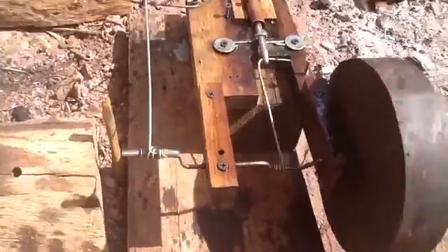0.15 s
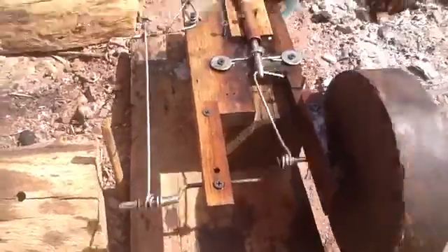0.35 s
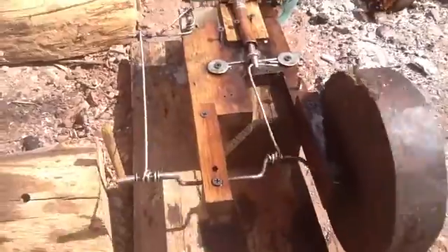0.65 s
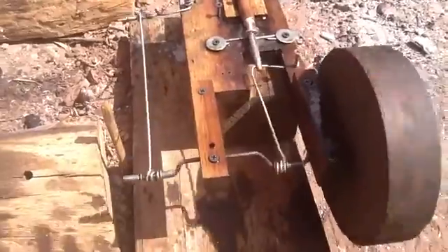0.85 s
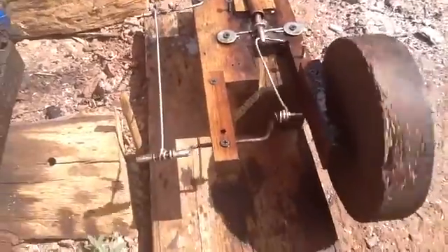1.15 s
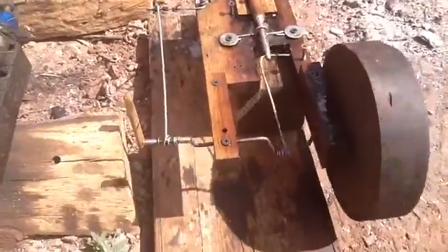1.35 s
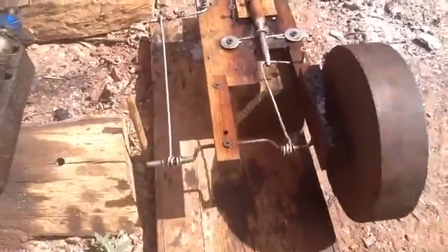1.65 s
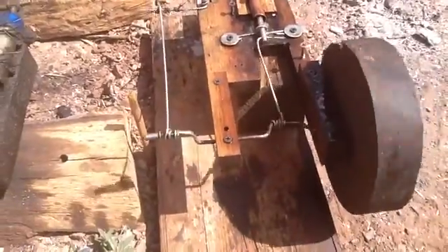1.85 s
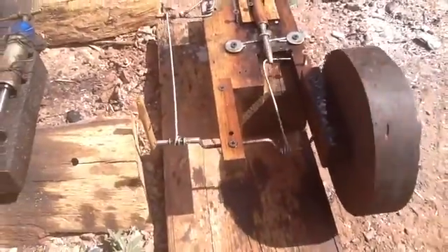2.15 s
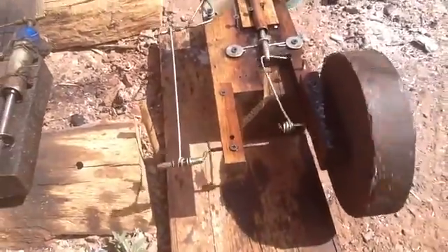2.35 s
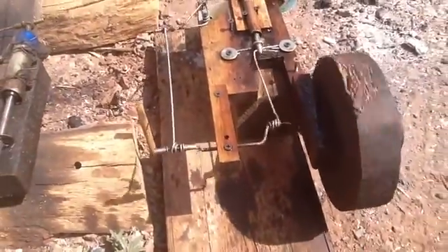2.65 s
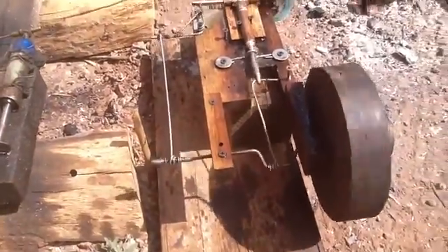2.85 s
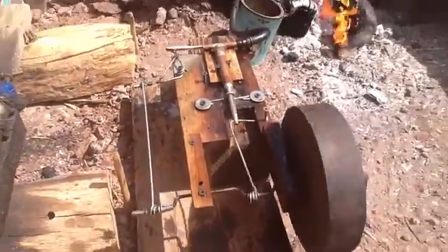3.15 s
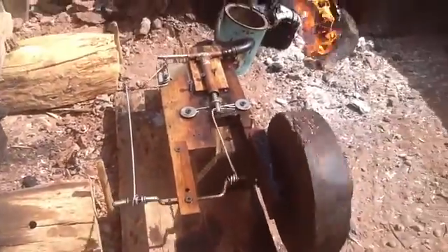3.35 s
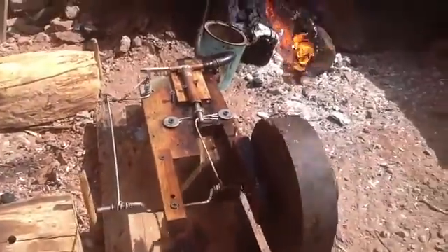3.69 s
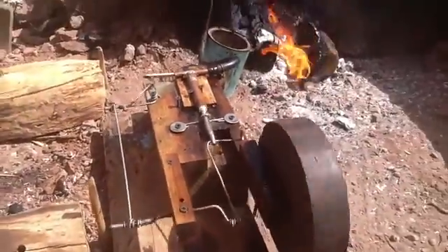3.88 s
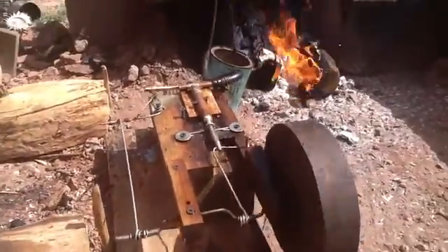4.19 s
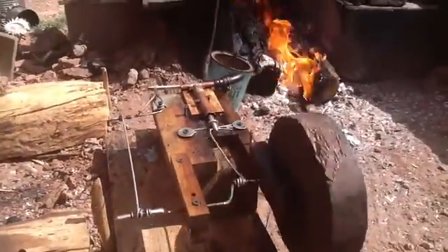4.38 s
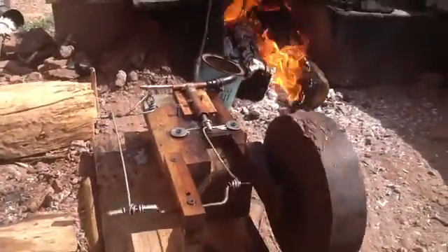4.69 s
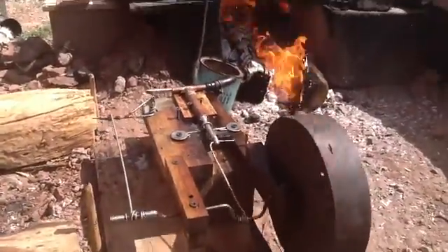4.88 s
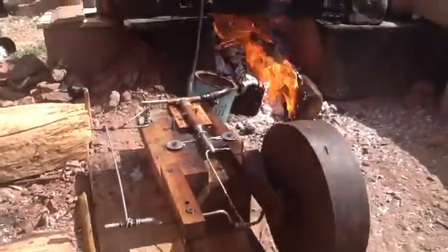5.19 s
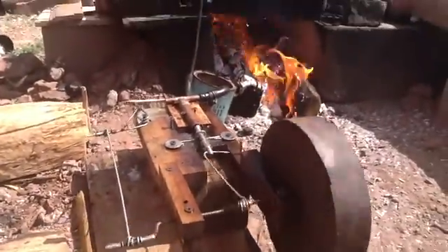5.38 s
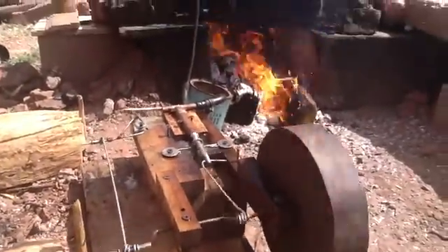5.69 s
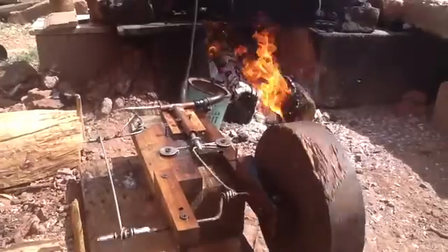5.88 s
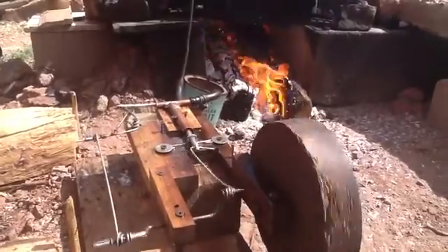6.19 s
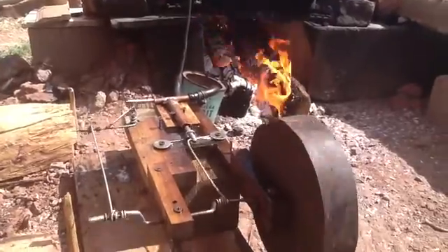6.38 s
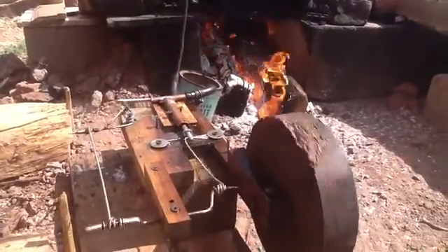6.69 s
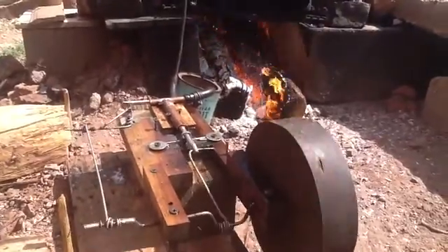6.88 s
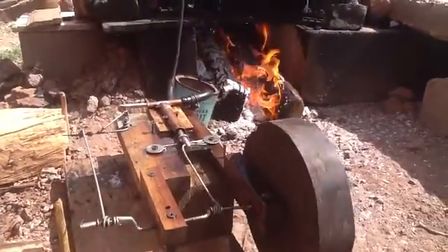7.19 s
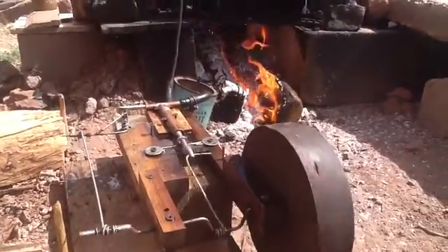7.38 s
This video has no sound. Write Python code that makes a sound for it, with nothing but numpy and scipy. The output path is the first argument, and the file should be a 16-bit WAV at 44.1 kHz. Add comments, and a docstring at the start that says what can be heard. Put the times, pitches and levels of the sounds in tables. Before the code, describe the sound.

A small homemade steam engine hisses and chuffs in a bright, fast rhythm outdoors, slowly speeding up, with a faint wood fire fluttering and popping behind.

```python
"""A small homemade steam engine runs outdoors, slowly gathering speed, with a wood fire under its boiler.
On every turn steam jets from the leaky valve, chuffs, and blows past the piston: shaped noise gated by
the crank angle. The shrinking cylinder space whistles upward as moving resonances, the exhaust pipe hums
and the rods knock as fixed ones. Behind them the fire flutters as low noise and the wood pops."""
import sys
import numpy as np
from scipy import signal
from scipy.fft import rfft, irfft, next_fast_len
from scipy.io import wavfile
from scipy.ndimage import uniform_filter1d, minimum_filter1d, map_coordinates

SR = 44100
rng = np.random.default_rng(int(sys.argv[2]) if len(sys.argv) > 2 else 0)


def log_audio(samples):
    """Write samples as a 16-bit WAV file to the path given in sys.argv[1]."""
    # one column per channel
    frames = np.atleast_2d(samples).T
    # limit to full scale, then quantise
    limited = np.clip(frames, -1, 1)
    pcm = np.round(limited * 32767).astype(np.int16)
    wavfile.write(sys.argv[1], SR, pcm)


N = 332514

# Colour of the jet and its droplets. Each row: frequency in Hz, relative level in dB.
JET_SPECTRUM = [(150.0, -48), (600.0, -31), (1500.0, -18), (3000.0, -19), (4200.0, -14.5), (5500.0, -10.5),
                (7000.0, -0.5), (8500.0, -0.5), (10000.0, -2.3), (12500.0, 0.5), (15200.0, 2.5)]


def amp(db):
    """Decibels to gain."""
    return 10 ** (np.asarray(db) / 20)


def unit(x):
    """Scale to rms 1."""
    return x / np.sqrt(np.mean(x ** 2) + 1e-20)


def along(points, hz):
    """(Hz, value) points read on a log frequency axis."""
    f, value = np.transpose(points)
    return np.interp(np.log(hz + 1), np.log(f + 1), value)


def wobble(rate):
    """A smooth random curve with rate knots a second."""
    knots = rng.standard_normal(int(N * rate / SR) + 4)
    return map_coordinates(knots, [np.arange(N) * rate / SR])


def filtered(x, response):
    """x times a response given as a function of frequency in Hz."""
    m = next_fast_len(N + 8192)
    return irfft(rfft(x, m) * response(np.fft.rfftfreq(m, 1 / SR)), m)[:N]


def noise(spectrum):
    """Noise of rms 1 with the given spectrum."""
    return unit(filtered(rng.standard_normal(N), lambda hz: amp(along(spectrum, hz))))


def resonate(x, modes):
    """x through a body's fixed resonances, in parallel with alternating signs."""
    def response(f):
        total = 0
        for k, (centre, width, db) in enumerate(modes):
            damping = 1j * f * width
            total = total + (-1) ** k * amp(db) * damping / (centre ** 2 - f ** 2 + damping)
        return total
    return filtered(x, response)


def whistle(hz, breadth):
    """Turbulence ringing in one moving resonance, rms 1; its width is the share breadth of its pitch."""
    cycles = np.cumsum(hz) / SR
    knots = rng.standard_normal((2, int(cycles[-1] * breadth) + 4))
    a, b = [map_coordinates(k, [cycles * breadth]) for k in knots]
    return unit(a * np.cos(2 * np.pi * cycles) + b * np.sin(2 * np.pi * cycles))


def crank_angle():
    """Turns made by the crank as the flywheel gathers speed ever faster."""
    start_turn, start_speed = .047, 2.3111  # turns, turns/s
    speed_gain, gain_growth = .0955, .03888  # turns/s2, turns/s3
    t = np.arange(N) / SR
    speed = start_speed + speed_gain * t + gain_growth * t ** 2 / 2
    return start_turn + np.cumsum(speed) / SR


def opening(crank, start, attack, hold, release):
    """Gain of a gap fully open at start once a turn; attack and release span 20 dB, all in turns."""
    since = (crank - start) % 1
    closing = np.maximum(since - hold, 0) / release
    reopening = (1 - since) / attack
    return amp(-20 * np.minimum(closing, reopening))


def flow(puffs, crank):
    """Strength of a leak: its puffs add in power."""
    return np.sqrt(sum((amp(db) * opening(crank, *shape)) ** 2 for *shape, db in puffs))


def leak(strength, spectrum, drift_db, sputter_db):
    """A steam leak opened by the crank; wet steam makes it drift and sputter."""
    return strength * amp(drift_db * wobble(14) + sputter_db * wobble(220)) * noise(spectrum)


def valve_seating(crank):
    """The valve seats a little differently on each turn, so its leaks vary in strength."""
    spread_db = 0.96
    per_turn = rng.standard_normal(int(crank[-1]) + 2)
    return amp(spread_db * map_coordinates(per_turn, [crank]))


def valve_flow(crank):
    """Jet strength: puffs on every turn over a steady leak, since the valve never quite seals."""
    # Each row: fully open at, attack, hold and release in turns, level in dB.
    jet_puffs = [(.315, 0.32, .02, 0.25, -12.2), (.65, 0.28, 0.079, .12, -14),
                 (.782, .045, .012, 0.076, -8), (.85, .12, 0.32, 0.067, -13)]
    return np.hypot(flow(jet_puffs, crank), amp(-21.5))


def steam_jet(jet_flow, seating):
    """Steam hisses brightly from the leaky valve."""
    return leak(seating * jet_flow, JET_SPECTRUM, drift_db=.5, sputter_db=1.24)


def steam_chuff(crank, seating):
    """Steam chuffs on every turn as crank-gated noise, varying with the valve's seating."""
    # Each row: fully open at, attack, hold and release in turns, level in dB.
    chuff_puffs = [(.07, .06, .01, .1, -23), (.172, .26, 0.029, 0.08, -14), (.79, .1, 0.12, 0.16, -17)]
    # Each row: frequency in Hz, relative level in dB.
    chuff_spectrum = [(300.0, -44), (1400.0, -25), (2100.0, -17.5), (2900.0, -13), (3400.0, -11),
                      (4000.0, -6.5), (4700.0, -2), (6000.0, -0.5), (7500.0, 3), (9000.0, -4),
                      (10500.0, -27), (15000.0, -8)]
    return leak(seating * flow(chuff_puffs, crank), chuff_spectrum, drift_db=0.5, sputter_db=1.6)


def piston_blowby(crank):
    """Steam blows past the piston as noise gated by the crank."""
    # Each row: fully open at, attack, hold and release in turns, level in dB.
    blowby_puffs = [(.15, 0.16, 0.072, .09, -25), (.29, .05, 0.043, .14, -25), (.49, 0.52, 0.23, 0.19, -21),
                    (.78, 0.049, .03, 0.2, -21)]
    # Each row: frequency in Hz, relative level in dB.
    blowby_spectrum = [(150.0, -29), (500.0, -19), (1000.0, -14.5), (1700.0, -7), (2350.0, -3.5),
                       (2900.0, -5.5), (3400.0, -2), (4100.0, -1), (5000.0, 2.1), (7000.0, -0.5),
                       (10000.0, -0.4), (15000.0, -27.5)]
    return leak(flow(blowby_puffs, crank), blowby_spectrum, drift_db=1.35, sputter_db=0.66)


def cylinder(crank, unsteady_db):
    """The space ahead of the piston shrinks, so its resonances climb."""
    # Each row: pitch in Hz with the piston out, share of its length lost over the stroke,
    # width over pitch, drive in dB as steam enters, drive in dB as it is squeezed.
    cylinder_modes = [(3425, .505, .165, -31, -17), (5830, .365, .125, -23.5, -20),
                      (7520, .45, .14, -19, -20)]
    outer_turn = .3  # the piston is farthest out
    angle = 2 * np.pi * (crank - outer_turn)
    travel = (1 - np.cos(angle)) / 2
    # rings all through the inward stroke
    steady = amp(-34.5) * np.sqrt(np.maximum(np.sin(angle), 0))
    inlet = opening(crank, start=0.28, attack=0.11, hold=0.018, release=0.18)
    compression = opening(crank, start=0.6865, attack=.19, hold=0.02, release=0.19)
    sound = np.zeros(N)
    for hz, squeeze, breadth, inlet_db, compression_db in cylinder_modes:
        drive = np.hypot(steady, amp(inlet_db) * inlet + amp(compression_db) * compression)
        ringing = whistle(hz / (1 - squeeze * travel), breadth)
        sound += drive * amp(unsteady_db * wobble(60)) * ringing
    return sound


def valve(crank):
    """The closing valve gap whistles briefly, falling in pitch."""
    # In turns: fully open at, attack, hold, release.
    valve_gap = (.857, 0.057, .03, 0.034)
    open_hz, fall_hz_per_turn, level_db = 5190, 9500, -27.5
    past_opening = (crank - valve_gap[0] + .5) % 1 - .5
    hz = np.abs(open_hz - fall_hz_per_turn * past_opening)
    return opening(crank, *valve_gap) * amp(level_db + 1.1 * wobble(5.3)) * whistle(hz, breadth=0.13)


def spit(jet_flow, rate, spit_db):
    """Droplets of condensate burst in the jet as tiny clicks, about rate of them a second."""
    bursts = (rng.random(N) < rate / SR) * rng.standard_normal(N)
    clicks = unit(filtered(bursts, lambda hz: amp(along(JET_SPECTRUM, hz))))
    return jet_flow * amp(spit_db) * clicks


def exhaust(crank):
    """Spent steam gurgles through the pipe, exciting its resonances."""
    # Each row: fully open at, attack, hold and release in turns, level in dB.
    pipe_puffs = [(.32, .24, .02, .26, -41.5), (.66, 0.33, 0.033, 0.13, -37.5),
                  (.79, 0.079, 0.18, 0.3, -37.5)]
    # Each row: resonance in Hz, width in Hz, relative level in dB.
    pipe_modes = [(534, 56, -3.5), (728, 82, -4), (1026, 380, -6), (1193, 157, 1)]
    gurgle = amp(1.0 * wobble(9) + 2.5 * wobble(120))
    hum = unit(resonate(rng.standard_normal(N), pipe_modes))
    return flow(pipe_puffs, crank) * gurgle * hum


def reflections(x, echo_db, sway, count):
    """Frame, flywheel and ground answer within milliseconds; the delays drift as the hand sways."""
    n = np.arange(N)
    echoes = np.zeros(N)
    for seconds in rng.uniform(.002, .009, count):
        delay = (seconds + sway * wobble(1.5)) * SR
        echoes += rng.choice([-1, 1]) * map_coordinates(x, [n - delay], order=3)
    return (x + amp(echo_db) * echoes / np.sqrt(count)) / np.hypot(1, amp(echo_db))


def heard_from_view(steam, notch_db, notch_width_hz):
    """The jets beam their sound, so its colour shifts as the microphone moves; a reflection cuts a notch."""
    # The microphone moves around the engine.
    # Each row: time in seconds, share of the far colour from 0 to 1, notch centre in Hz.
    view = [(0, 0.1, 8200), (.6, 0.07, 9000), (3.3, 0.17, 9800), (4, 0.64, 11000), (4.35, 0.74, 11700),
            (4.7, 0.67, 15100), (5.2, .95, 11000), (7.5, 0.9, 10950)]
    # Steam level at the microphone. Each row: time in seconds, level change in dB.
    loudness = [(0, 0.6), (.4, -1.3), (.9, 1), (1.4, .5), (2, -1.05), (2.7, -0.9), (3.15, 0.5), (3.6, -0.2),
                (4.2, .7), (4.8, 1), (5.25, 2), (5.7, -2.4), (6, 1), (6.8, -0.6), (7.5, -0.2)]
    # Steam colour from near, then from far. Each row: frequency in Hz, level change in dB.
    near_colour = [(500, -1.5), (1150, 1), (1400, -2), (1700, 4.5), (1900, 0), (2280, 5), (2750, -0.5),
                   (3370, 4), (4150, 1.5), (6000, 3), (7400, 1), (8700, -1.5), (11000, 3.5), (15000, 0)]
    far_colour = [(1250, -3), (1420, 1.5), (1620, -4.5), (2000, 1), (2380, -6.5), (2700, 2), (2980, -2),
                  (3250, -1.5), (4100, -4.5), (5700, 1), (7400, 0.2), (8700, 4), (11000, 2.5), (15000, 0)]
    hz, t, z = signal.stft(steam, SR, nperseg=512)
    s, *columns = np.transpose(view)
    far, notch_hz = [np.interp(t, s, column) for column in columns]
    level_db = np.interp(t, *np.transpose(loudness))
    hz = hz[:, None]
    colour_db = (1 - far) * along(near_colour, hz) + far * along(far_colour, hz)
    notch = np.exp(-((hz - notch_hz) / notch_width_hz) ** 2)
    heard = z * amp(level_db + colour_db + notch_db * notch)
    return signal.istft(heard, SR, nperseg=512)[1][:N]


def rods(crank, knock_db, return_db):
    """The loose crank knocks as the load reverses, twice a turn."""
    knock_turns = [.225, .81]
    knock_modes = [(533, 51, -6.0), (830, 65, 0), (1260, 78, 3.0), (2010, 240, 1)]  # Hz, width Hz, dB
    turn = np.arange(int(crank[-1]))[:, None] + knock_turns
    force = np.zeros(N)
    force[np.searchsorted(crank, turn)] = amp(rng.uniform(-8.0, 5.2, turn.shape) + [0, return_db])
    return amp(knock_db) * unit(resonate(force, knock_modes))


def bumps(length, cut_hz):
    """Soft contacts push the air for about one cycle, with no ring and little deep bass."""
    # Each row: centre in seconds, level in dB before the bass cut, pitch in Hz.
    soft_contacts = [(4.734, -28, 200), (6.913, -23, 240), (6.935, -19.5, 206)]
    t = np.arange(N) / SR
    pushes = np.zeros(N)
    for s, db, hz in soft_contacts:
        pushes += amp(db) * np.exp(-((t - s) / length) ** 2) * np.sin(2 * np.pi * hz * (t - s))
    return filtered(pushes, lambda hz: hz ** 2 / (hz ** 2 + cut_hz ** 2))


def blows(events, body):
    """Sudden snaps ringing a body, scaled so the tallest peak has the level of the strongest snap."""
    force = np.zeros(N)
    for s, db in events:
        force[int(s * SR)] = amp(db)
    ring = resonate(force, body)
    return ring * force.max() / np.abs(ring).max()


def fire():
    """Flames flutter as low noise and the burning wood pops with a short ring."""
    # Flutter of the flames. Each row: time in seconds, relative level in dB.
    flame_levels = [(0, -45), (.65, -42), (1.3, -45), (3.4, -45), (4.2, -44.5), (4.6, -41.5), (5.35, -42),
                    (5.8, -46.5), (7.5, -46)]
    # Each row: frequency in Hz, relative level in dB.
    flame_spectrum = [(20, -56), (45, -49), (65, -36), (100, -12.5), (130, -6), (172, 1.5), (215, -3.5),
                      (290, -6), (390, -14.5), (700, -13.5), (1500, -37), (4000, -50)]
    # Sharp pops. Each row: start in seconds, level in dB.
    wood_pops = [(3.45, -19), (3.846, -14.5), (4.957, -4.7)]
    # What the splitting wood rings with. Each row: resonance in Hz, width in Hz, relative level in dB.
    wood_modes = [(350, 250, -10), (740, 450, -3), (1780, 280, 3), (3430, 700, -6), (5000, 1400, -7)]
    level_db = np.interp(np.arange(N) / SR, *np.transpose(flame_levels))
    flutter_db = 0.66 * wobble(8.5) + 1.7 * wobble(25)
    flames = amp(level_db + 2.5 + flutter_db) * noise(flame_spectrum)
    return flames + blows(wood_pops, wood_modes)


def scene():
    """The crank angle drives every steam sound; both channels are alike."""
    crank = crank_angle()
    seating = valve_seating(crank)
    jet_flow = valve_flow(crank)
    steam = steam_jet(jet_flow, seating) + steam_chuff(crank, seating) + piston_blowby(crank)
    steam += cylinder(crank, unsteady_db=2) + valve(crank)
    steam += spit(jet_flow, rate=280, spit_db=-16) + exhaust(crank)
    steam = amp(-0.95) * reflections(steam, echo_db=-14.0, sway=.00008, count=6)  # sway in seconds
    steam = heard_from_view(steam, notch_db=-3.0, notch_width_hz=350)
    knocks = rods(crank, knock_db=-52, return_db=-5)
    contacts = bumps(length=0.0024, cut_hz=57)  # length in seconds
    mono = steam + knocks + contacts + fire()
    return np.array([mono, mono])


def record(dry):
    """A limiter holds down the tallest peaks; nothing is kept above the band limit."""
    top_hz = 15350
    needed = np.minimum(1, .97 / (np.abs(dry[0]) + 1e-9))
    gain = uniform_filter1d(minimum_filter1d(needed, size=65), size=45)
    return np.array([filtered(channel, lambda hz: hz < top_hz) for channel in dry * gain])


dry = scene()
out = record(dry)
log_audio(out)
```